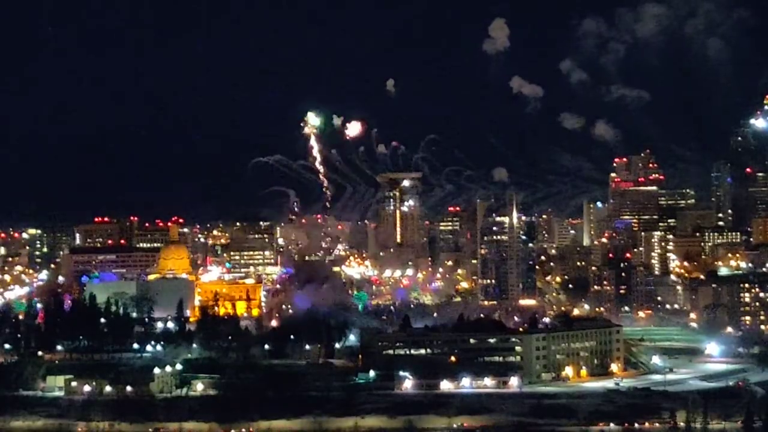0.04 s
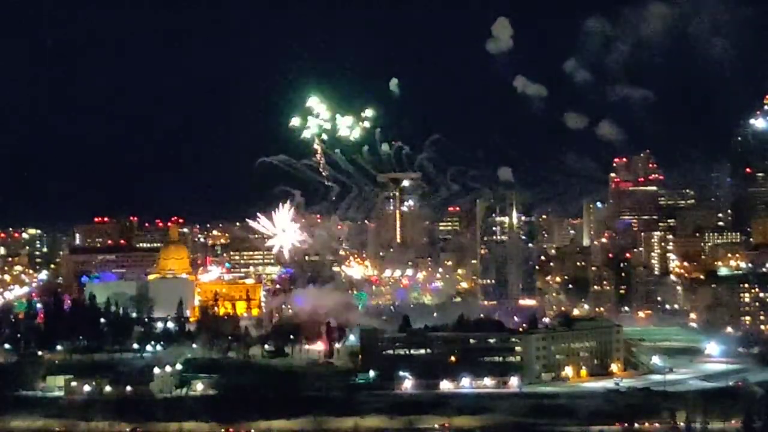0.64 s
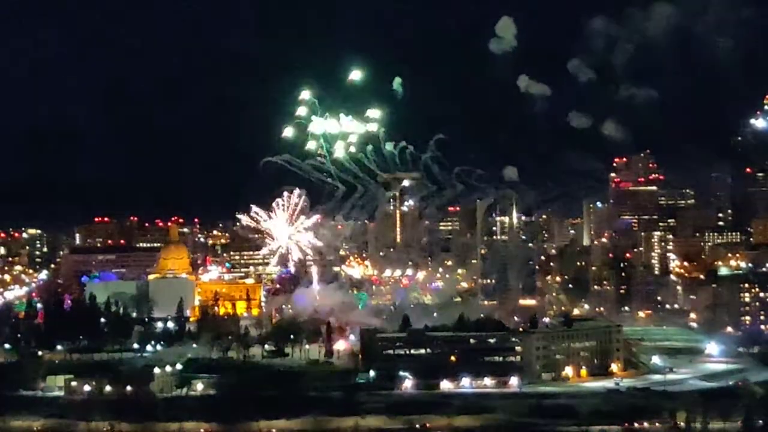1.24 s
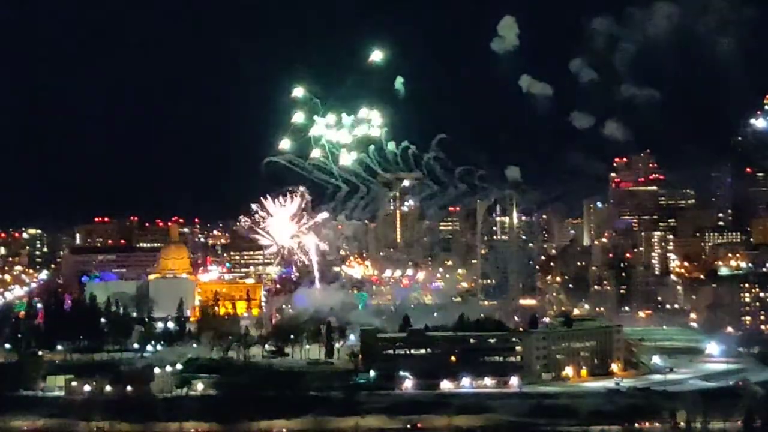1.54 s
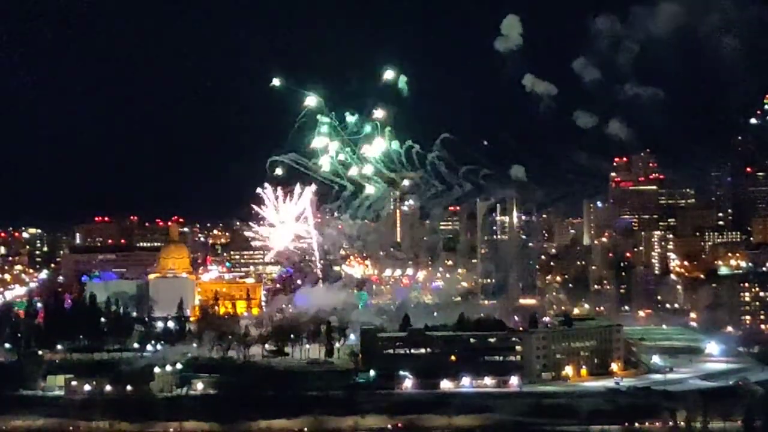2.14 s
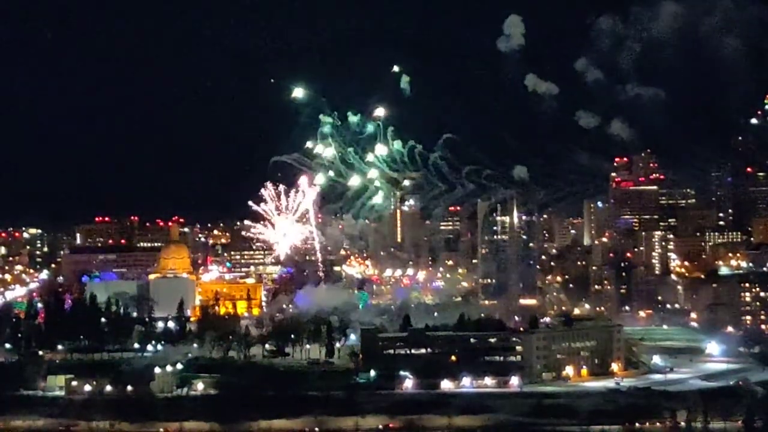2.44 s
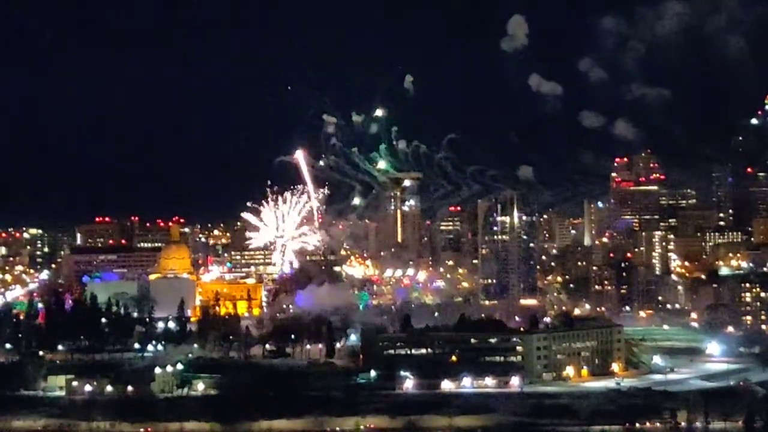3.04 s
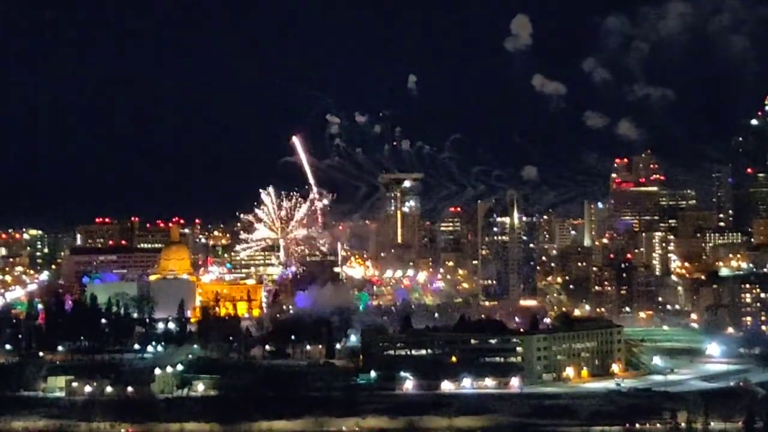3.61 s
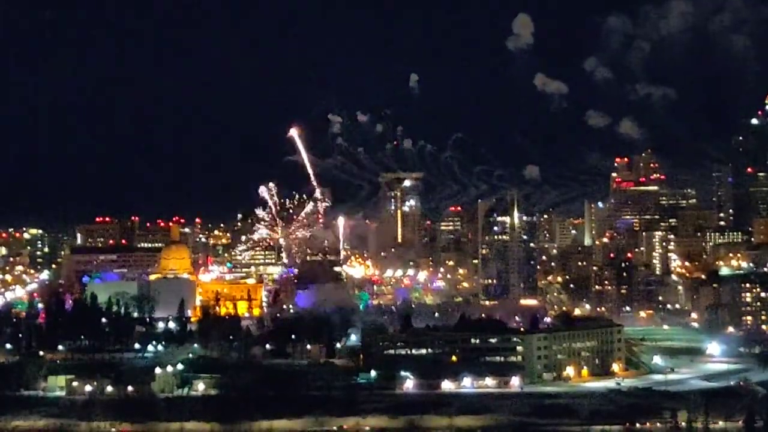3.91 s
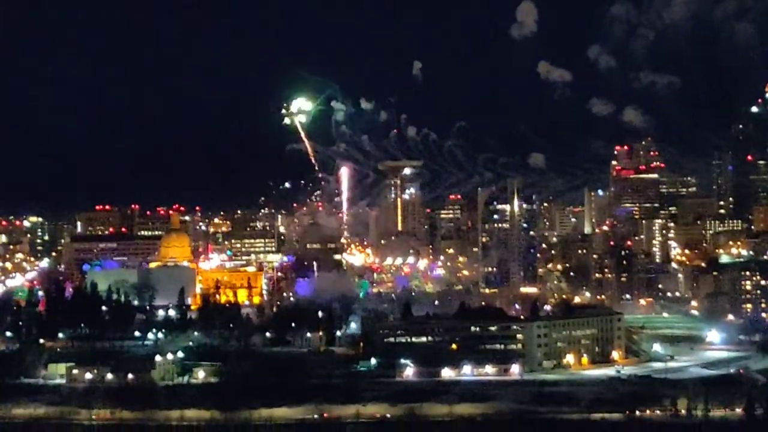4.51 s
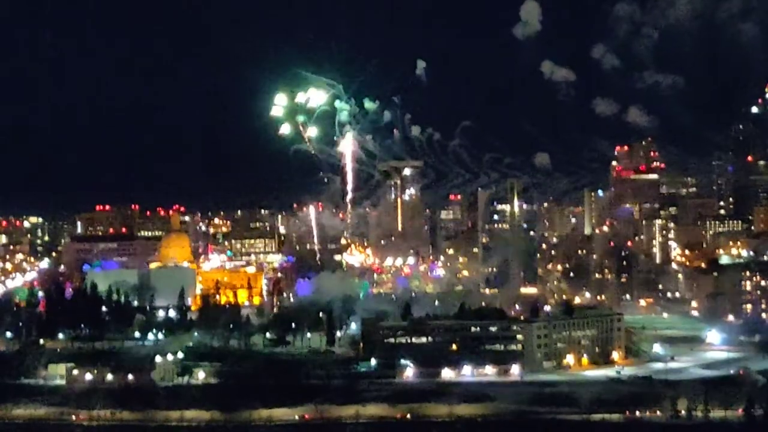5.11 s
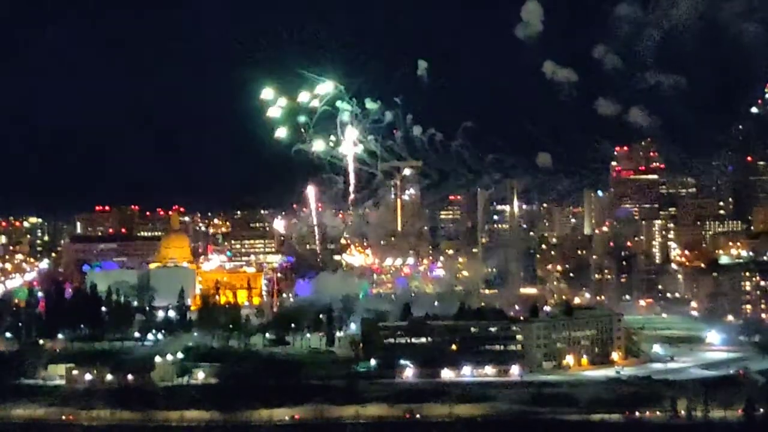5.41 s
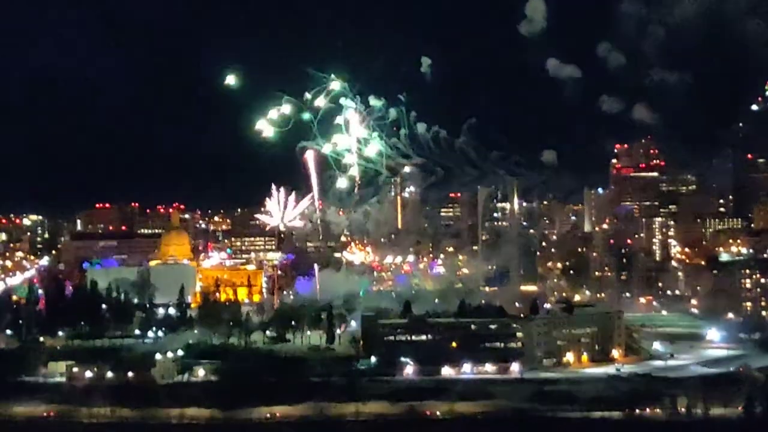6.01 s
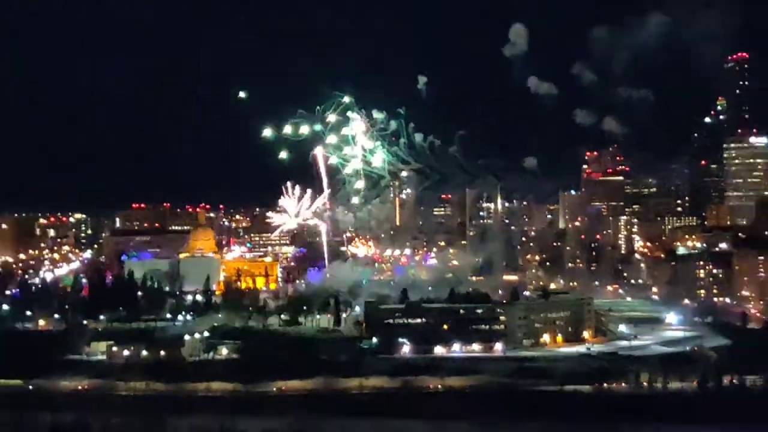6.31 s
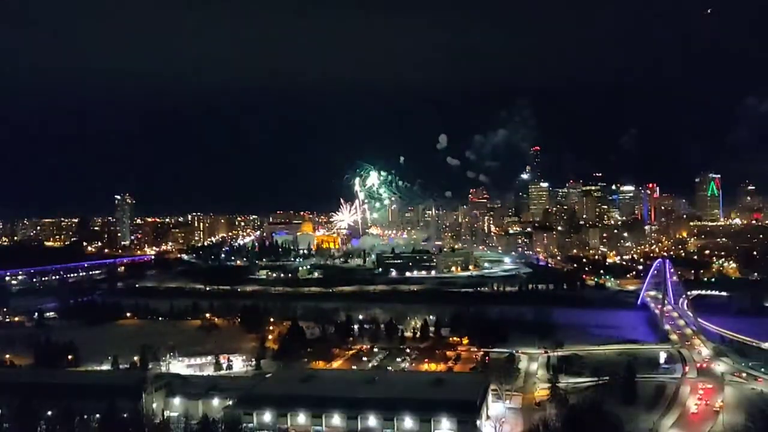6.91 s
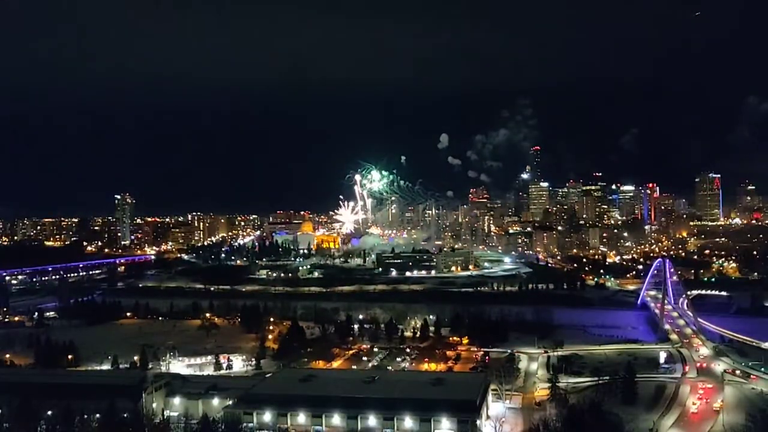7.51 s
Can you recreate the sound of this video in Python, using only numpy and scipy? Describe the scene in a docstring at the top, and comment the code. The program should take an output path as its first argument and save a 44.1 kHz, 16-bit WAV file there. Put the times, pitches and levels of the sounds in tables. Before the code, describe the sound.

Fireworks are heard from far across an open river valley, over a continuous rolling rumble and a low city hum. From the start, launches thump in irregular clusters, each slapping back off buildings and rolling away. Softer, muffled booms come around 1.8 to 2.2 seconds. From 2.5 seconds, fingers faintly tick and scuff on the hand-held camera. Shells crack overhead at about 2.8 and 3.1 seconds, followed by more strong thumps until about 5.8 seconds. Faint deep thuds join at 3.9 seconds, then a thin high hiss creeps in. Between 4.6 and 5.1 seconds, fingers bump the microphone in a quick, loud run on the left, briefly ducking everything else. Sharp cracks with a short ring land at 6.2 and 7.1 seconds, with another finger bump at 7 seconds and muffled booms until the end, near 7.7 seconds.

```python
"""Far fireworks across a river valley. From the start old echoes merge into a rolling rumble over a city hum;
mortars thump at street level and slap back off two city blocks, some (first at 1.8 s) with a muffled boom.
From 2.5 s fingers make a hand-held camera's case tick and scuff it; from 2.8 s shells crack overhead.
Deep thuds join at 3.9 s, then a faint high hiss creeps in. From 4.6 s fingers bump the left microphone
port and the limiter ducks. At 6.2 s and 7.1 s sharp cracks ring briefly."""
import sys
import numpy as np
from scipy import signal
from scipy.fft import rfft, irfft, next_fast_len
from scipy.io import wavfile
from scipy.ndimage import uniform_filter1d, minimum_filter1d, map_coordinates

SR = 44100
rng = np.random.default_rng(int(sys.argv[2]) if len(sys.argv) > 2 else 0)


def unload_audio(sound):
    """Save the sound as a 16-bit wav file, at the path given as the first command line argument."""
    columns = np.transpose(np.atleast_2d(sound))
    # keep every value between -1 and 1, then stretch to whole-number steps
    steps = np.round(np.clip(columns, -1, 1) * 32767)
    wavfile.write(sys.argv[1], SR, steps.astype(np.int16))


N = 341775

# rumble envelope: t/s, level/dB
RUMBLE_LEVELS = [(0, -23.5), (.78, -26.5), (1.1, -24), (3.93, -27), (4.8, -23.5), (5.1, -32.5),
                 (5.48, -27.5), (7.15, -25.5), (7.75, -29)]
# treble envelopes: t/s, air/dB, hiss/dB
TREBLE_LEVELS = [(0, -61, -94), (4.2, -60.5, -81.5), (4.9, -57.5, -65), (5.25, -68, -73), (6.4, -61, -66.5),
                 (7.75, -64.5, -66.5)]
# spectra of rumble, air and hiss: f/Hz, density/dB
RUMBLE_SPECTRUM = [(20, -25.5), (45, -9), (140, 1.5), (280, -2), (420, 1), (570, -11.5), (800, -11.5),
                   (1150, -23.5), (1550, -24), (1850, -45), (4000, -77.5)]
AIR_SPECTRUM = [(900, -31), (1900, 3.5), (3600, -12), (6500, -17), (13000, -21), (16000, -38.5)]
HISS_SPECTRUM = [(5000, -33.5), (8000, -10.5), (9700, 0.5), (10300, -17.5), (12000, -36.5)]
# left-right likeness of diffuse sound: f/Hz, correlation
COHERENCE = [(60, 0.88), (150, 0.98), (380, 0.84), (950, 0.035)]
# mortar shots: t/s, level/dB, pressure push/ms, share rolling on through the city/dB,
# treble edge/Hz (high for crisp shots, low for dull ones)
MORTARS = [(0.16, -7.5, 0.49, -1, 1920), (0.2514, -8, 0.41, -2, 2200), (0.3117, 2, 0.41, -6.5, 3970),
           (0.62, -1, 0.42, -4.5, 7050), (0.6746, 0, 0.44, -4.5, 6000), (0.9804, -0.5, 0.42, -5.5, 8040),
           (1.265, -4, 0.39, -1.5, 5500), (1.837, -11.5, 0.46, -5.5, 2230), (2.1421, -9.5, 0.48, -1, 1500),
           (2.2048, -8.5, 0.4, -8.5, 1700), (2.5021, -5.5, 0.47, -11.5, 2400),
           (3.3658, 0.5, 0.51, -4.5, 4440), (3.428, 0, 0.49, -5, 5000), (3.784, 1, 0.47, -4, 2800),
           (4.323, -2, 0.4, -4.5, 4200), (4.334, 0, 0.53, -5.5, 3470), (4.7083, 2, 0.49, -7, 3000),
           (4.888, -1.5, 0.39, -3, 1600), (5.1909, -8, 0.51, -6, 1300), (5.3096, -10.5, 0.53, -8.5, 1190),
           (5.3636, 0, 0.5, -10, 980), (5.794, 2, 0.5, -5, 2200), (6.7056, -11.5, 0.5, -5.5, 1000),
           (6.897, -9, 0.5, -2.5, 1500), (7.338, -9.5, 0.42, -7.5, 1710)]
# resonances near the microphone: f/Hz, width/Hz, gain/dB
BLAST_RESONANCES = [(405.2, 71, 4), (124, 49, -0.5), (901, 110, 1.5), (1459, 140, 10.5), (2700, 850, -6)]
# reflections off nearby surfaces: delay/ms, gain
NEAR_ECHOES = [(5, 0.05), (13.5, 0.074)]
# wave-front crack: f/Hz, density/dB
CRACK_SPECTRUM = [(500, -3.5), (1000, 5), (1700, 11), (2600, 3), (4500, -16.5), (9000, -26.5)]
# echo envelopes of the city and its nearest towers: delay/s, level/dB
CITY_DECAY = [(0, -11), (.016, -0.5), (0.059, 1), (.11, -4.5), (0.169, -24.5), (.4, -21), (.9, -28)]
TOWER_DECAY = [(.03, -27), (.046, -3.5), (.12, -9), (.25, -40.5)]
# city blocks answering each mortar: delay/s, level over rolling share/dB, push length ratio
BLOCK_ECHOES = [(.042, -3.5, 0.92), (.056, -5.5, 1.204)]
# muffled booms: t/s, level/dB, second swell over first/dB
MUFFLED_BOOMS = [(1.837, -8, -3.5), (2.142, -14, -0.5), (2.204, -15, 4.5), (6.705, -7.5, -1),
                 (6.896, -16.5, 5), (7.337, -11, 1)]
# case ticks, and the midrange snap of two fingertip bumps on the left port (4.91 s, 4.94 s): t/s, level/dB,
# f/Hz
CLICKS = [(2.511, -28.5, 6600), (2.615, -30.5, 6500), (4.9081, 0.5, 902), (4.937, -2, 1396),
          (5.579, -21.5, 1600), (6.684, -22, 1460), (7.133, -12, 1784), (7.187, -27, 2100)]
# fingers sliding on the case: t/s, level/dB, length/s, left over right/dB, pressure 0-1
CASE_SCUFFS = [(2.652, -53, 0.145, 1, 0.05), (4.213, -38.5, 0.1, 19, 0.3), (4.571, -43, .02, 15, 1),
               (5.403, -41, 0.072, 25, 1), (5.481, -44.5, 0.037, 19, 0.9), (5.577, -35, 0.0087, 27, 0.8),
               (6.964, -35.5, 0.021, 23.5, 0.7), (7.129, -35, 0.012, 28.5, 0.45)]
# skin friction, light and firm: f/Hz, density/dB
LIGHT_SPECTRUM = [(1500, -26), (4000, -8.5), (6500, -2.5), (9000, -15.5), (12000, -10.5), (14500, -2),
                  (16000, -6)]
FIRM_SPECTRUM = [(200, -10), (1700, 2), (2500, -1), (4500, -11.5), (9000, -18.5), (15000, -13.5)]
# shell bursts overhead, and two quick echoes of the sharp crack at 6.23 s:
# t/s, level/dB, pressure push/ms, rolling share/dB, treble edge/Hz
BURSTS_AND_ECHOES = [(2.798, -6, 0.39, -16.5, 1600), (2.823, -1, 0.36, -7.5, 3600),
                     (3.086, 0, 0.39, -14, 4500), (6.227, -4, 0.25, -21.5, 8000),
                     (6.2435, -7, 0.47, -21, 950), (6.254, -4, 0.33, -21.5, 3700),
                     (7.1105, -3.5, 0.37, -14, 1900)]
# flutter after a burst: f/Hz, density/dB
FLUTTER_SPECTRUM = [(400, -4), (950, 8), (1400, -10.5), (6000, -57.5)]
# ground answering a burst: delay/s, level over rolling share/dB, push length ratio
GROUND_ECHOES = [(0.0892, 0.998, 1.32)]
# deep thuds: t/s, level/dB
DEEP_THUDS = [(3.872, -32), (4.455, -38), (5.998, -34.5), (7.227, -33)]
# thud noise: f/Hz, density/dB
THUD_SPECTRUM = [(25, -13), (75, 0.5), (160, -46.5), (600, -100)]
# fingers on the left port: t/s, level/dB, relative crackle/dB, decay/s
PORT_BUMPS = [(4.641, -5.5, -7.5, 0.017), (4.756, 2, -9.5, 0.0088), (4.792, 7, -14, 0.0053),
              (4.8559, 6, -8.5, 0.0054), (4.909, 2, -6, 0.0059), (4.936, 2, -10, 0.0061),
              (4.9998, 7, -11, 0.004), (5.009, 7, -16, 0.01), (5.054, 9.5, -14.5, 0.0076),
              (6.973, -12.5, -13, 0.024), (7.003, 7.5, -30, 0.0035)]
# skin crackle: f/Hz, density/dB
CRACKLE_SPECTRUM = [(150, 12), (600, 8), (1400, 0), (2400, -5), (8000, -29), (15000, -35.5)]
# ringing of the sharpest cracks: t/s, level/dB, f/Hz, decay/s
CRACK_RINGS = [(6.225, 4, 1170, 0.0015), (6.2249, -13, 1470, 0.003), (6.253, -6, 500, 0.0078),
               (6.251, -22, 1436, .009), (7.11, -5.5, 437, 0.0056)]

LEAD_SAMPLES = 256  # room ahead of a wave front


def amp(db):
    """dB to gain."""
    return 10 ** (np.asarray(db) / 20)


def unit_rms(x):
    """Scale to rms 1."""
    return x / np.sqrt(np.mean(x ** 2) + 1e-20)


def log_interp(points, hz):
    """Interpolate (f/Hz, value) points on a log axis."""
    knots_hz, values = np.transpose(points)
    return np.interp(np.log(hz + 1), np.log(knots_hz + 1), values)


def envelopes(rows):
    """One value per sample for each column after t/s."""
    times_s, *columns = np.transpose(rows)
    return [np.interp(np.arange(N) / SR, times_s, column) for column in columns]


def wobble(rate_hz):
    """Smooth random curve with knots at rate_hz."""
    knots = rng.standard_normal(int(N * rate_hz / SR) + 4)
    return map_coordinates(knots, [np.arange(N) * rate_hz / SR])


def filtered(x, response):
    """Apply a complex frequency response."""
    n = x.shape[-1]
    size = next_fast_len(n + 8192)
    return irfft(rfft(x, size) * response(np.fft.rfftfreq(size, 1 / SR)), size)[..., :n]


def noise(spectrum):
    """Two independent noises, same spectrum, rms 1."""
    return unit_rms(filtered(rng.standard_normal((2, N)), lambda hz: amp(log_interp(spectrum, hz))))


def spread(pair):
    """Two independent signals to left and right, alike in the bass."""
    def weights(hz):
        angle = np.arccos(np.clip(log_interp(COHERENCE, hz), -1, 1)) / 2
        return np.array([np.cos(angle), np.sin(angle)])
    mid, side = filtered(pair, weights)
    return np.array([mid + side, mid - side])


def add(track, start_s, sound):
    """Mix a sound into a track."""
    part = track[..., max(round(start_s * SR), 0):][..., :sound.shape[-1]]
    part += sound[..., :part.shape[-1]]


def valley(rumble_gain_db):
    """Old echoes and city drone merge into a restless rumble; above it faint air and, left, a hiss."""
    rumble_db, = envelopes(RUMBLE_LEVELS)
    air_db, hiss_db = envelopes(TREBLE_LEVELS)
    rumble = unit_rms(spread(noise(RUMBLE_SPECTRUM)) * amp(0.96 * wobble(13) + 1.8 * wobble(70)))
    air = amp(air_db) * noise(AIR_SPECTRUM)
    hiss = amp(hiss_db) * noise(HISS_SPECTRUM) * amp([[0], [-20]])
    return amp(rumble_db + rumble_gain_db) * rumble + air + hiss


def city_hum(hz, level_db):
    """The city's low hum, wavering slightly in pitch and level."""
    phase = 2 * np.pi * np.cumsum(hz + 0.67 * wobble(3.8)) / SR
    return np.sqrt(2) * np.sin(phase) * amp(level_db + 2.9 * wobble(8.3))


def blast(push_ms, softness=1.0, size=4096):
    """Blast wave, peak 1: push, longer suction, short ring."""
    hz = np.fft.rfftfreq(size, 1 / SR)
    jw_per_ms = 2j * np.pi * hz / 1000
    u = jw_per_ms * push_ms
    wave = u / (1 + u) ** 2 / (1 + softness * u) ** 3
    low_cut_hz = 140 * (0.46 / push_ms) ** 2  # short pushes carry little bass
    body = 1 + sum(amp(db) * 1j * hz * width_hz / (centre_hz ** 2 - hz ** 2 + 1j * hz * width_hz)
                   for centre_hz, width_hz, db in BLAST_RESONANCES)
    walls = 1 + sum(gain * np.exp(-jw_per_ms * delay_ms) for delay_ms, gain in NEAR_ECHOES)
    pulse = irfft(wave * body * walls * 1j * hz / (1j * hz + low_cut_hz))
    return pulse / np.abs(pulse).max()


def crack(report_db, push_ms, size=4096):
    """Dry snap of the wave front, louder for a stronger, shorter push."""
    t = np.arange(size) / SR
    front = 0.33 * rng.standard_normal(size) * np.exp(-t / 0.0024)  # rough wake from turbulent air
    front[0] = 1
    snap = irfft(amp(log_interp(CRACK_SPECTRUM, np.fft.rfftfreq(size, 1 / SR))))
    snap = np.roll(snap, LEAD_SAMPLES) / snap.max()
    level_db = 3.5 * report_db + 9 - 93 * push_ms
    return amp(level_db) * signal.fftconvolve(front, snap)[:size]


def treble_loss(x, edge_hz):
    """Steep low-pass, as on a long path through air."""
    return filtered(x, lambda hz: 1 / np.sqrt(1 + (hz / edge_hz) ** 10))


def facade_echoes(wave, decay, echoes_per_s, scatter_db, size):
    """A wave off many facades: two sparse echo trains, each of gain 1 in energy."""
    delay_s, db = np.transpose(decay)
    hits = (rng.random((2, size)) < echoes_per_s / SR) * rng.choice([-1, 1], (2, size))
    decay_db = np.interp(np.arange(size) / SR, delay_s, db)
    echoes = hits * amp(decay_db + scatter_db * rng.standard_normal((2, size)).clip(-2, 2))
    echoes /= np.linalg.norm(echoes, axis=1, keepdims=True)
    return signal.fftconvolve(echoes, wave[None], axes=1)


def reports(roll_gain_db, rattle_gain_db):
    """Each report arrives, then returns crisply off the towers and dully from the city."""
    fronts, echoes = np.zeros(N), np.zeros((2, N))
    for start_s, db, push_ms, share_db, edge_hz in MORTARS + BURSTS_AND_ECHOES:
        wave = blast(push_ms, softness=0.84)
        report = amp(db) * np.pad(wave, (LEAD_SAMPLES, 0))[:-LEAD_SAMPLES] + crack(db, push_ms)
        add(fronts, start_s - LEAD_SAMPLES / SR, treble_loss(report, edge_hz))
        roll = facade_echoes(wave, CITY_DECAY, echoes_per_s=420, scatter_db=5.5, size=40000)
        add(echoes, start_s, amp(db + share_db + roll_gain_db) * roll)
        crisp = blast(0.44 * push_ms)  # small facades return only short waves
        rattle = facade_echoes(crisp, TOWER_DECAY, echoes_per_s=97, scatter_db=3.5, size=12000)
        add(echoes, start_s, amp(db + share_db + rattle_gain_db) * rattle)
    return fronts + treble_loss(spread(echoes), edge_hz=3700)


def slaps(arrivals, reflectors, depth_s, behind_db, side_db, surfaces):
    """Each report returns off a reflector's front, then off a few surfaces just behind it."""
    mid_side = np.zeros((2, N))
    echoes = [(start_s + delay_s, db + share_db + gain_db, push_ms * stretch)
              for start_s, db, push_ms, share_db, _ in arrivals
              for delay_s, gain_db, stretch in reflectors]
    for start_s, db, push_ms in echoes:
        add(mid_side[0], start_s, amp(db) * blast(push_ms))
        for late, width, aside in rng.random((surfaces, 3)):
            wave = blast(push_ms * (0.5 + 0.73 * width))
            bearing = np.array([[1], [amp(side_db) * (2 * aside - 1)]])
            add(mid_side, start_s + depth_s * (0.1 + late), amp(db + behind_db) * bearing * wave)
    mid, side = mid_side
    return np.array([mid + side, mid - side])


def booms(mean_hz, rise_s, gap_s):
    """Muffled reports without a front: two soft, hollow swells."""
    track, t = np.zeros(N), np.arange(SR // 20) / SR
    envelope = t / rise_s * np.exp(1 - t / rise_s)
    for start_s, db, second_db in MUFFLED_BOOMS:
        hz = mean_hz * rng.normal(1, 0.062)
        swell = envelope * np.sin(2 * np.pi * hz * t)
        add(track, start_s, amp(db) * swell)
        add(track, start_s + gap_s, amp(db + second_db) * swell)
    return track


def ticks(q, decay_s, right_db):
    """Short clicks: the case ticks under the grip, and two fingertip bumps snap; each a burst of grit through
    one short resonance."""
    track, t = np.zeros(N), np.arange(SR // 20) / SR
    for start_s, db, pitch_hz in CLICKS:
        grit = rng.standard_normal(len(t)) * np.exp(-t / decay_s)
        click = filtered(grit, lambda hz: 1 / (1 - (hz / pitch_hz) ** 2 + 1j * hz / (pitch_hz * q)))
        add(track, start_s, amp(db) * click / np.abs(click).max())
    return track * amp([[0], [right_db]])


def scuffs():
    """Skin slides over the case: a light touch hisses, a firm one rasps lower."""
    light, firm = np.zeros((2, 2, N))
    for start_s, db, length_s, pan_db, pressure in CASE_SCUFFS:
        u = np.linspace(0, 1, int(length_s * SR))
        swell = amp([[db], [db - pan_db]]) * np.sin(np.pi * u ** 1.8)  # slow build, quick stop
        add(light, start_s, np.sqrt(1 - pressure) * swell)
        add(firm, start_s, np.sqrt(pressure) * swell)
    stick_slip = amp(3.5 * wobble(500))
    return (light * noise(LIGHT_SPECTRUM) + firm * noise(FIRM_SPECTRUM)) * stick_slip


def flutters(delay_s, rise_s, gain_db):
    """A hollow flutter swells and fades after each burst or quick echo."""
    envelope, u = np.zeros(N), np.arange(SR // 10) / SR / rise_s
    for start_s, db, _, share_db, _ in BURSTS_AND_ECHOES:
        add(envelope, start_s + delay_s, amp(db + share_db + gain_db) * u * np.exp(1 - u))
    return envelope * noise(FLUTTER_SPECTRUM)


def thuds(rise_s, gain_db):
    """Slow swells of deep noise under the display."""
    envelope, u = np.zeros(N), np.arange(SR) / SR / rise_s
    for start_s, db in DEEP_THUDS:
        add(envelope, start_s, amp(db + gain_db) * u ** 2 * np.exp(-2 * (u - 1)))
    return envelope * noise(THUD_SPECTRUM)[0]


def bumps(base_hz, settle_s, overload_db, right_db):
    """A fingertip pumps the left port's air: slowing swings plus skin crackle, softly overloading."""
    port, t = np.zeros(N), np.arange(SR // 10) / SR
    grits = np.array_split(noise(CRACKLE_SPECTRUM)[0], len(PORT_BUMPS))
    for (start_s, db, crackle_db, decay_s), grit in zip(PORT_BUMPS, grits):
        contact = (1 - np.exp(-t / 0.00077)) * np.exp(-(t / decay_s) ** 2)
        settled_hz = base_hz * np.exp(-0.08 * max(db, 0))  # harder is lower
        hz = settled_hz * (1 + 1.39 * np.exp(-t / settle_s))
        swing = -0.64 * np.sin(2 * np.pi * np.cumsum(hz) / SR)
        crackle = amp(crackle_db + 3) * grit[:len(t)]
        add(port, start_s, amp(db) * contact * (swing + crackle))
    return amp(overload_db) * np.tanh(port / amp(overload_db)) * amp([[0], [right_db]])


def rings(waver, rise_s):
    """The sharpest cracks ring briefly at an unsteady pitch."""
    track, t = np.zeros(N), np.arange(SR // 10) / SR
    for start_s, db, hz, decay_s in CRACK_RINGS:
        phase = 2 * np.pi * np.cumsum(hz * (1 + waver * wobble(360)[:len(t)])) / SR
        envelope = (1 - np.exp(-(t / rise_s) ** 2)) * np.exp(-t / decay_s)
        add(track, start_s, amp(db) * envelope * np.sin(phase))
    return track


def scene():
    """Far display and valley slightly left; fingers on the camera, mostly far left."""
    echoes = slaps(MORTARS, BLOCK_ECHOES, depth_s=0.02, behind_db=-10.5, side_db=-6, surfaces=5)
    echoes += slaps(BURSTS_AND_ECHOES, GROUND_ECHOES, depth_s=0.026, behind_db=-8.5, side_db=-13,
                    surfaces=4)
    display = (reports(roll_gain_db=1.67, rattle_gain_db=-15.5)
               + treble_loss(echoes, edge_hz=2800)
               + booms(mean_hz=398, rise_s=0.002, gap_s=0.01008)
               + rings(waver=0.094, rise_s=0.0019)
               + flutters(delay_s=0.033, rise_s=0.0036, gain_db=-11.5))
    background = (valley(rumble_gain_db=0.44) + city_hum(hz=67.66, level_db=-39)
                  + thuds(rise_s=0.062, gain_db=5))
    fingers = (bumps(base_hz=166.6, settle_s=0.0048, overload_db=12.5, right_db=-40.5)
               + scuffs() + ticks(q=3.2, decay_s=0.0011, right_db=-22))
    return (display + background) * amp([[0.9], [-0.9]]) + fingers


def record(dry):
    """The camera's limiter ducks both channels at a peak, holds, releases; then a band limit."""
    ceiling_db, hold_s, release_db_per_s, top_hz = -0.5, 0.043, 96.5, 16000
    attack_samples, half_hold = SR // 500, int(hold_s * SR) // 2
    peak_db = 20 * np.log10(np.abs(dry).max(axis=0) + 1e-9)
    needed_db = np.minimum(ceiling_db - peak_db, 0)
    held_db = minimum_filter1d(needed_db, 2 * half_hold + 1, origin=half_hold - attack_samples // 2)
    release_db = release_db_per_s * np.arange(N) / SR
    gain_db = np.minimum.accumulate(held_db - release_db) + release_db
    limited = dry * amp(uniform_filter1d(gain_db, attack_samples))
    return filtered(limited, lambda hz: hz < top_hz)


dry = scene()
out = record(dry)
unload_audio(out)
```